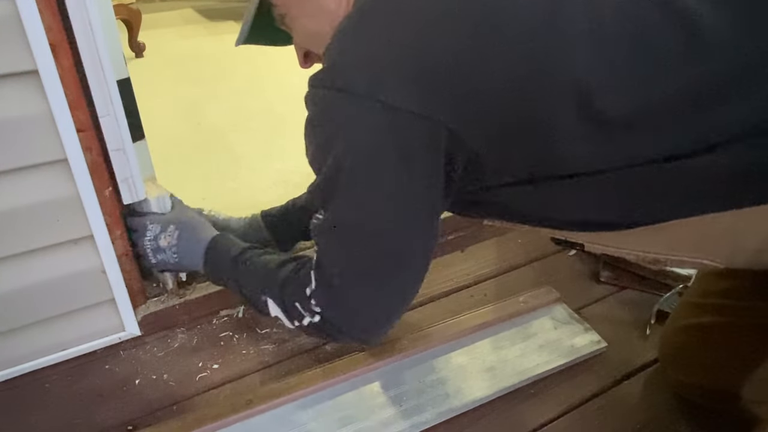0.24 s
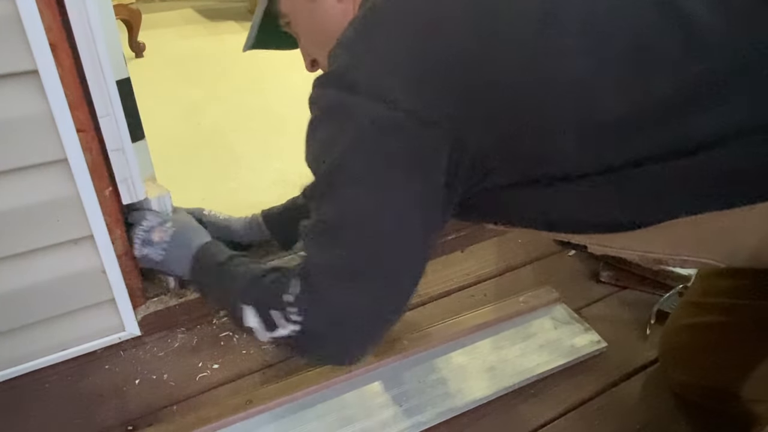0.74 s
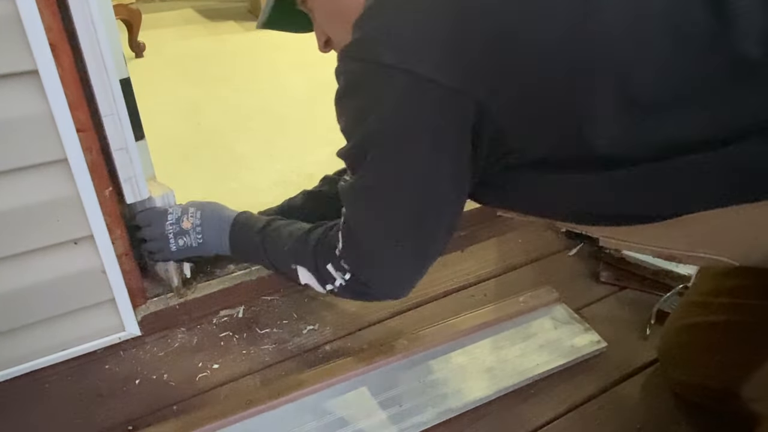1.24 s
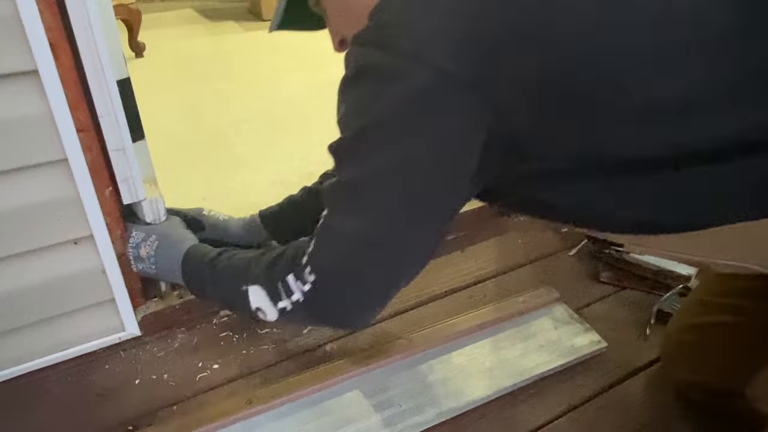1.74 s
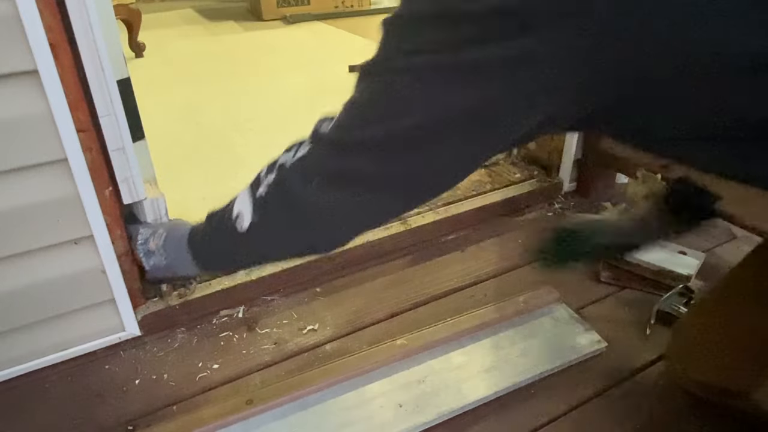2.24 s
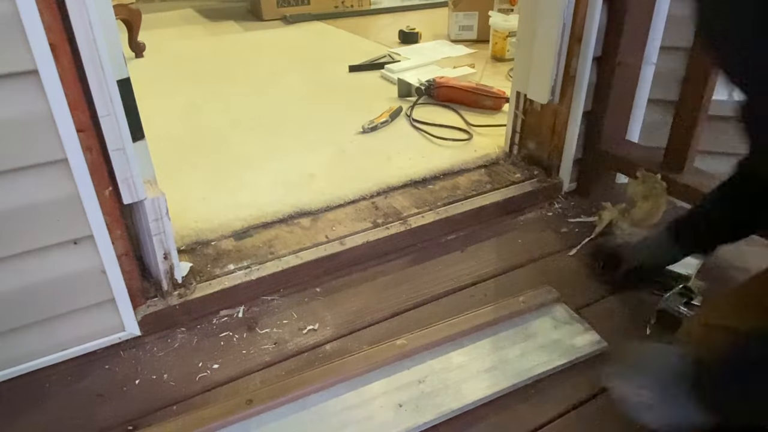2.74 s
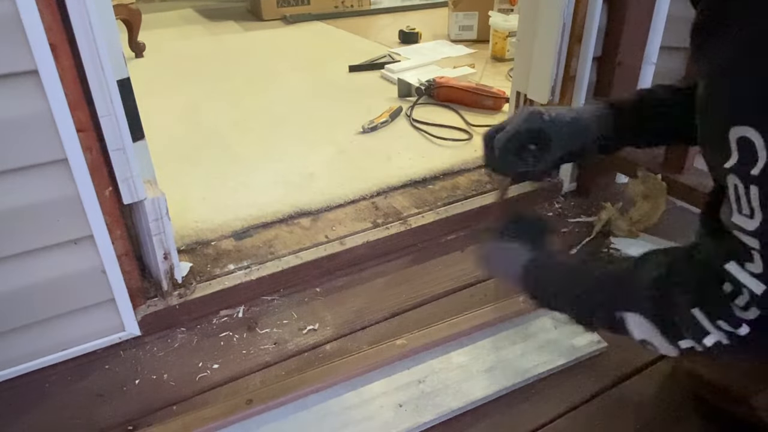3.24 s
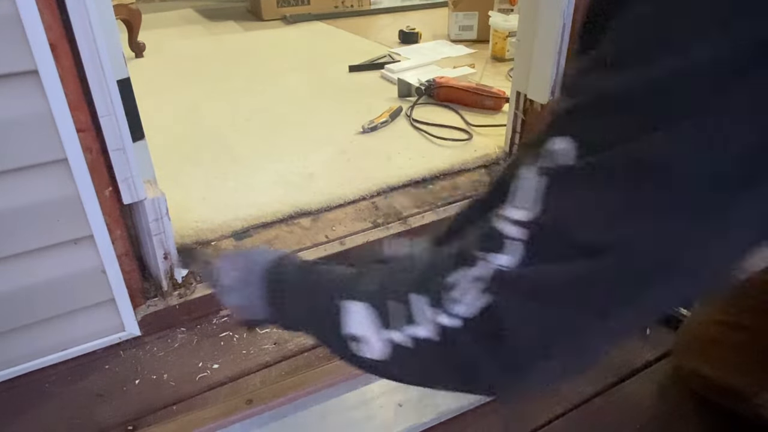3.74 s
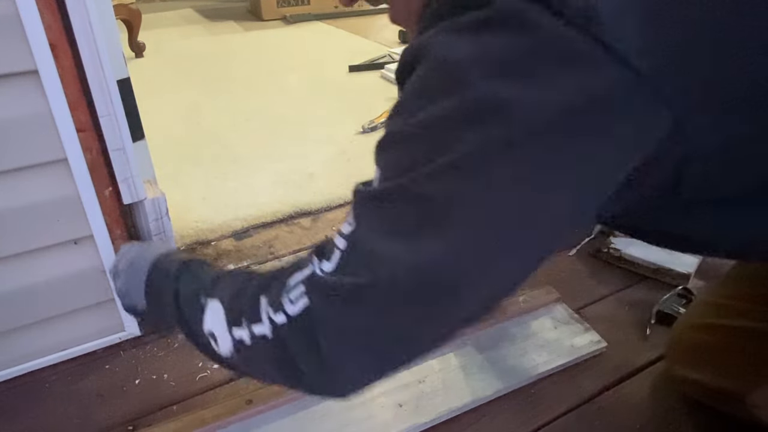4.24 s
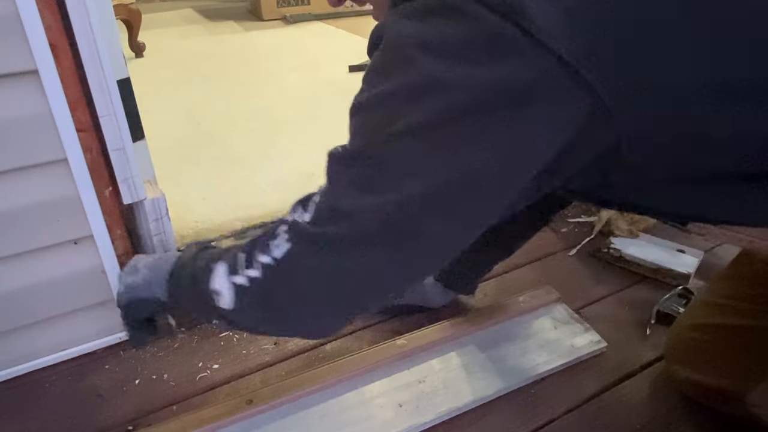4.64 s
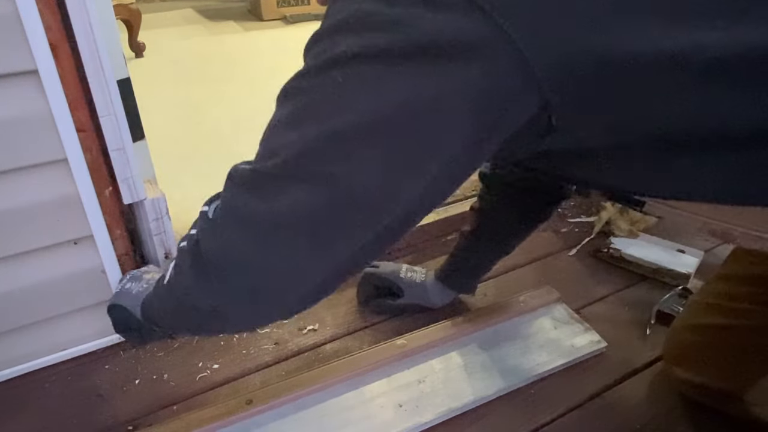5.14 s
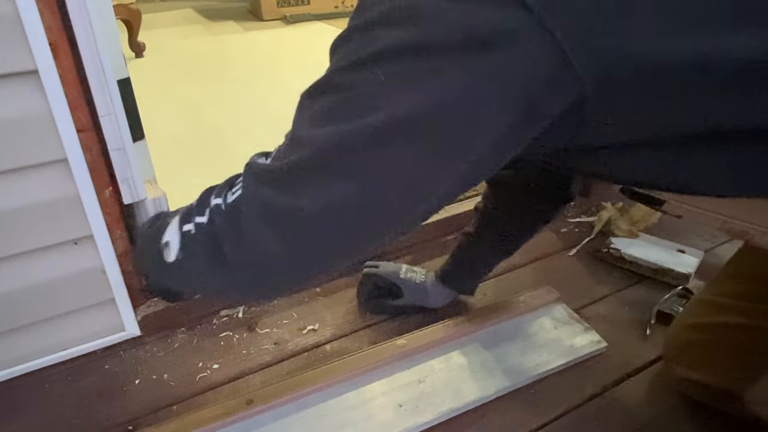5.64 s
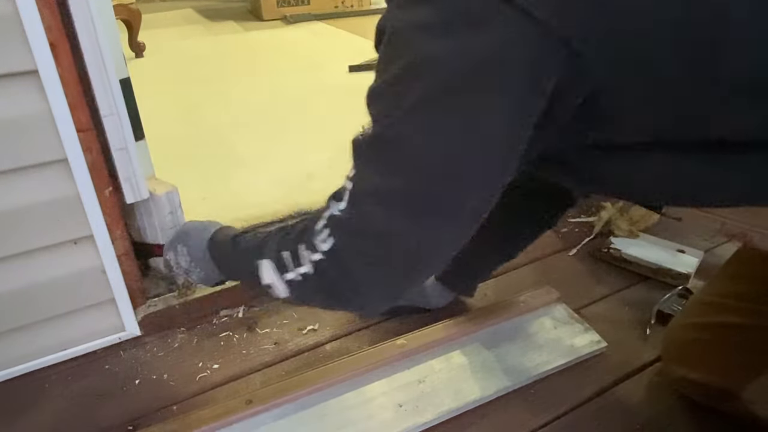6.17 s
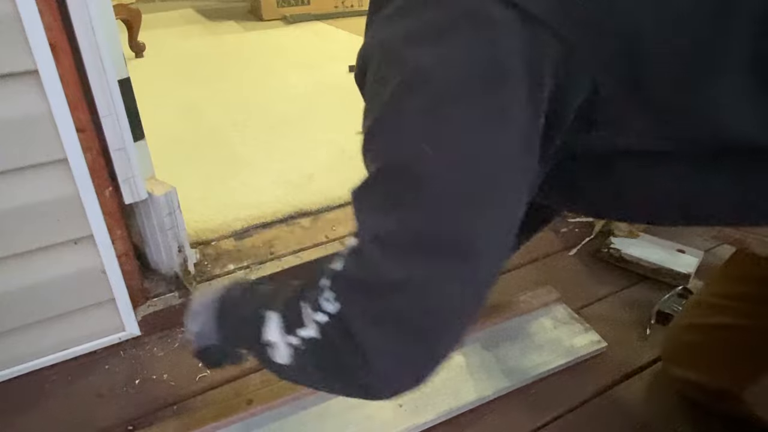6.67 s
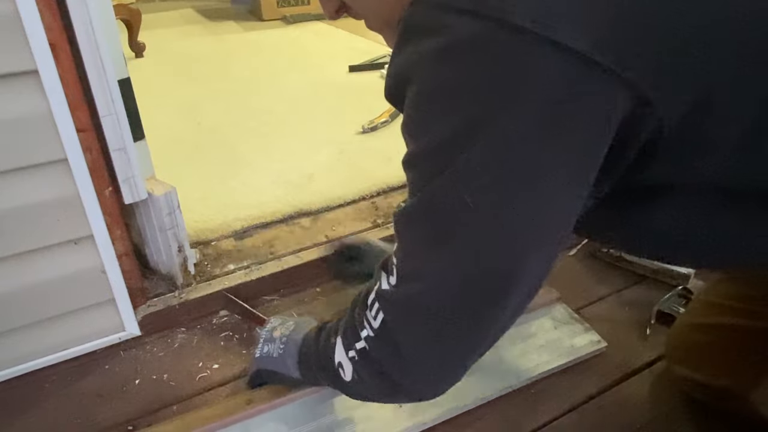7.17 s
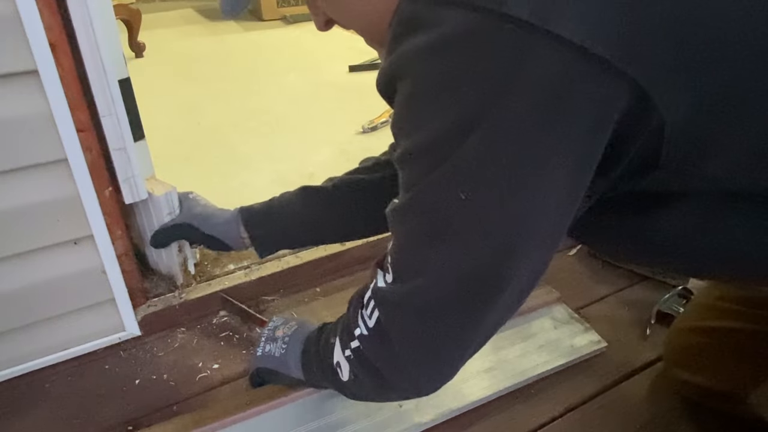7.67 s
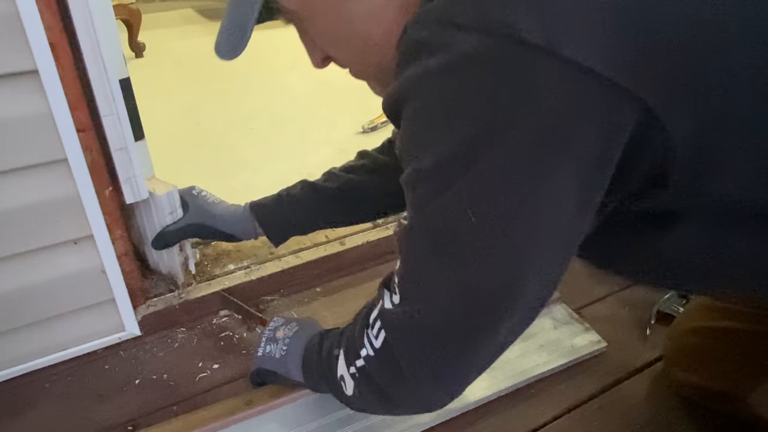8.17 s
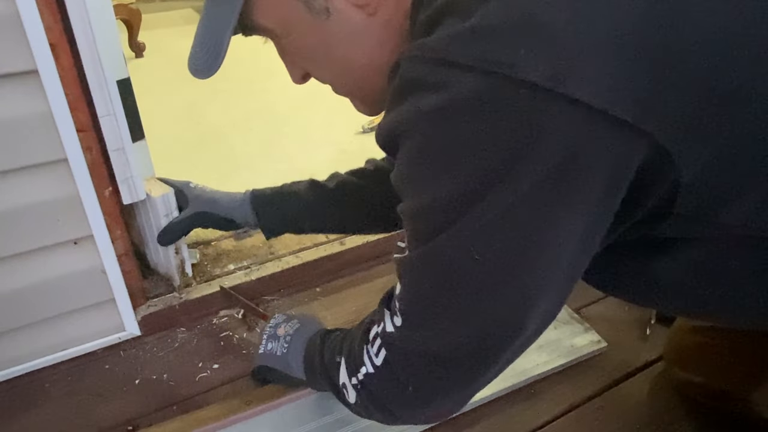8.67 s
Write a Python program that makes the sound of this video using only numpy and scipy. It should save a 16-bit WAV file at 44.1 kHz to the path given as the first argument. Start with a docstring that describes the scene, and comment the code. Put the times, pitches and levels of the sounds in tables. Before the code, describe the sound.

Close stereo microphone on a wooden porch. Gloved hands tear decayed wood from a jamb slightly to the left: sharp snaps, crunching fibres, knocks. A steel tool scrapes and clinks, followed by a heavy drop on boards. Cloth rustles, faint metal jingles, strained wood squeals thinly, then breaks hard. A piece is set down with a hollow knock, and a dry stick taps. Low rumble continues underneath.

```python
"""A low outdoor rumble with a faint wavering hum lies under everything, and sleeves rustle in short strokes.
Gloved hands tear rotten wood out of the foot of a door jamb: splinters snap, fibres crunch, pieces knock on planks.
Then a steel tool scrapes and rings, something heavy drops on the boards, and small metal parts jingle faintly.
Strained wood squeals before more breaks; later a piece is put down and a dry stick taps. The porch echoes.
Wood and steel are sums of fading tones; cracks, cloth and rumble are shaped noise; fibres are streams of ticks."""
import sys
import numpy as np
from scipy import signal
from scipy.fft import rfft, irfft, next_fast_len
from scipy.io import wavfile
from scipy.ndimage import uniform_filter1d, map_coordinates

SR = 44100
rng = np.random.default_rng(int(sys.argv[2]) if len(sys.argv) > 2 else 0)


def unload_audio(sound):
    """Save the sound as a 16-bit wav file, at the path given as the first command line argument."""
    columns = np.transpose(np.atleast_2d(sound))
    # keep every value between -1 and 1, then stretch to whole-number steps
    steps = np.round(np.clip(columns, -1, 1) * 32767)
    wavfile.write(sys.argv[1], SR, steps.astype(np.int16))


N = 392931  # length in samples
T = np.arange(SR // 2) / SR  # time in seconds within one short sound
JAMB_LEAD_S = .00041  # how much sooner the left microphone hears the jamb

# Ringing tones of a splinter or dry stick.
# Each row: pitch in Hz (a snap shifts it by chance), relative level in dB, time in seconds to fade by 60 dB.
SPLINTER_MODES = [(1480, 2, .07), (1560, 0, .06), (1870, -5, .045), (2300, 2, .04), (2770, 1, .045),
                  (4360, 0, .025), (5220, 0, .04), (6930, -6, .04), (7600, -3, .025), (11500, -6, .03)]


def amp(db):
    """Decibels to gain."""
    return 10 ** (np.asarray(db) / 20)


def unit(x):
    """Scaled to an rms (average strength) of 1."""
    return x / np.sqrt(np.mean(x ** 2) + 1e-20)


def struck(x):
    """Scaled to rms 1 over its first fiftieth of a second."""
    start = x[..., :SR // 50]
    return x / np.sqrt(np.mean(start ** 2) + 1e-20)


def along(points, hz):
    """Read (Hz, value) points at any frequency, with straight lines on a log axis."""
    point_hz, values = np.transpose(points)
    return np.interp(np.log(hz + 1), np.log(point_hz + 1), values)


def over_time(points):
    """Join (seconds, value) points into one value per sample."""
    return np.interp(np.arange(N) / SR, *np.transpose(points))


def wobble(rate):
    """A smooth random curve through rate random points a second."""
    points = rng.standard_normal(int(N * rate / SR) + 4)
    return map_coordinates(points, [np.arange(N) * rate / SR])


def envelope(s, hold, rise, fall):
    """Gain that is full from s for hold seconds; it takes rise and fall seconds to cover 30 dB."""
    t = np.arange(N) / SR - s
    before = np.maximum(-t, 0)
    after = np.maximum(t - hold, 0)
    return amp(-30 * (before / rise + after / fall))


def filtered(x, response):
    """Multiply the spectrum of x by a response that depends on frequency."""
    n = x.shape[-1]
    padded = next_fast_len(n + SR // 8)
    spectrum = rfft(x, padded) * response(np.fft.rfftfreq(padded, 1 / SR))
    return irfft(spectrum, padded)[..., :n]


def stereo(pair, width):
    """Use two unrelated signals as the middle and the sides."""
    middle, side = pair
    return np.array([middle + width * side, middle - width * side])


def noise(spectrum, width, size=N):
    """Coloured stereo noise of rms 1."""
    white = stereo(rng.standard_normal((2, size)), width)
    return unit(filtered(white, lambda hz: amp(along(spectrum, hz))))


def grains(spectrum, rate, spread_db, width):
    """A stream of tiny ticks of very unequal size, about rate a second, rms 1."""
    sizes = amp(spread_db * np.clip(rng.standard_normal(N), -2, 2))
    sizes = sizes * (rng.random(N) < rate / SR)
    ticks = stereo(rng.standard_normal((2, N)) * sizes, width)
    return unit(filtered(ticks, lambda hz: amp(along(spectrum, hz))))


def tone(hz):
    """A sine of rms 1 that follows a pitch curve."""
    return np.sqrt(2) * np.sin(2 * np.pi * np.cumsum(hz) / SR)


def burst(lo_hz, hi_hz, t60, attack, width):
    """Crowded, quickly damped vibrations of one frequency band, made of fading noise."""
    def band(hz):
        return 1 / np.sqrt((1 + (lo_hz / (hz + 1)) ** 8) * (1 + (hz / hi_hz) ** 8))

    crowd = filtered(stereo(rng.standard_normal((2, len(T))), width), band)
    return struck(crowd * amp(-60 * T / t60) * (1 - np.exp(-T / attack)))


def ring(modes, width, scatter_db):
    """Damped tones at new strengths, each reaching the two microphones in its own phase."""
    hz, db, t60 = np.transpose(modes)[:, :, None]
    size = amp(db + scatter_db * rng.standard_normal(hz.shape))
    phase = rng.uniform(0, 2 * np.pi, hz.shape) + width * rng.standard_normal((2, *hz.shape))
    fade = amp(-60 * T / t60)
    return np.sum(size * fade * np.sin(2 * np.pi * hz * T + phase), axis=1)


def patchy(x, depth_db, size):
    """Every few milliseconds the sound takes another colour; size sets how long a colour lasts."""
    z = signal.stft(x, nperseg=256)[2]
    field = uniform_filter1d(rng.standard_normal(z.shape[1:]), 3, 0)  # blurred over pitch
    field = uniform_filter1d(field, size, 1)  # then over time
    gain = unit(amp(depth_db * np.clip(unit(field), -2, 2)))
    return signal.istft(z * gain, nperseg=256)[1][:, :N]


def from_left(x, lead):
    """The left microphone hears it lead seconds sooner (half early on the left, half late on the right)."""
    return filtered(x, lambda hz: np.exp(1j * np.pi * hz * lead * np.array([[1], [-1]])))


def placed(s, x):
    """A sound made at time s comes from where the hands are: sooner and louder on the nearer side."""
    # Each row: time in seconds, side (1 = at the jamb on the left, 0 = straight ahead, below 0 = right).
    hands = [(0, 0.92), (1.7, 0.76), (2.2, 0.4), (3.3, -0.49), (3.85, 0.82), (6.3, 0.94), (6.95, -0.11),
             (8.9, 0.39)]
    side = np.interp(s, *np.transpose(hands))
    tilt_db = side * 0.53 * np.array([[1], [-1]])  # up on the left, down on the right
    return amp(tilt_db) * from_left(x, side * JAMB_LEAD_S)


def add(track, s, sound):
    """Mix a sound in at time s."""
    part = track[:, round(s * SR):][:, :sound.shape[1]]
    part += sound[:, :part.shape[1]]


def outdoors():
    """Distant rumble and wash are coloured noise; the wavering low tones are sines of drifting pitch."""
    # Two noise colours. Each row: frequency in Hz, relative level in dB per Hz.
    rumble_colour = [(13, -46), (22, -18), (29, -23), (40, -2.5), (65, 3.5), (97, -5.5), (119, -1.5),
                     (163, -15), (242, -18), (350, -23.5), (460, -23), (770, -120)]
    wash_colour = [(100, -36), (170, 2.5), (243, 2.5), (359, -12.5), (439, -6), (884, -5), (1210, -9.5),
                   (2210, -21), (2840, -27), (4600, -31), (7000, -49.5), (9100, -73), (15400, -120)]
    # Slow changes of loudness. Each row: time in seconds, relative level in dB.
    rumble_level = [(0.0, -45), (0.49, -47.5), (0.87, -44), (2.53, -45.5), (3.25, -39.5), (3.49, -45.5),
                    (5.33, -39), (5.72, -42.5), (8.9, -41.5)]
    wash_level = [(0.0, -58.5), (2.01, -57), (3.25, -50.5), (3.47, -52.5), (8.5, -51), (8.9, -52.5)]
    hum_level = [(0.0, -51), (3.77, -54.5), (4.14, -40), (5.11, -54), (8.65, -47.5), (8.9, -51)]
    rumble = amp(over_time(rumble_level) + 2.0) * noise(rumble_colour, width=0.2)
    wash = amp(over_time(wash_level) + 3.5 + 0.42 * wobble(15.0)) * noise(wash_colour, width=0.89)
    hum = amp(over_time(hum_level) - 2 + 1.5 * wobble(6.6)) * tone(111 + 3 * wobble(7.9))
    # a deeper drone swells for a moment
    drone = amp(2 * wobble(14)) * tone(73 + 5 * wobble(25))
    swell = amp(-36.5) * envelope(4.8, 0.68, rise=0.62, fall=0.17)
    return rumble + wash + hum + swell * drone


def hiss():
    """The microphones' own faint noise."""
    colour = [(1000, -7.5), (4000, -1), (9000, -1.5), (12000, 1.0), (16000, -14)]  # Hz, dB
    return amp(-72.5) * noise(colour, width=0.2)


def sleeves():
    """Cloth and gloves brush along crumbly wood in short, flat-topped strokes of noise and ticks."""
    # Strokes. Each row: centre in seconds, length in seconds between half-gain points, relative level in dB.
    strokes = [(0.061, 0.082, -50.5), (0.225, 0.12, -60), (1.076, 0.08, -50.5), (1.475, 0.13, -60.5),
               (2.122, 0.39, -64.5), (2.365, 0.16, -48.5), (2.785, 0.062, -54.5), (2.884, 0.036, -54.5),
               (3.531, 0.066, -61), (4.428, 0.21, -63.5), (4.639, 0.029, -57.5), (4.87, 0.068, -58.5),
               (6.29, 0.09, -59.5), (6.387, 0.017, -55), (6.949, 0.23, -60.5), (8.38, 0.12, -58)]
    # Colour of the rubbing. Each row: frequency in Hz, relative level in dB per Hz.
    cloth_colour = [(530, -28), (900, 2.5), (1900, -6.5), (2630, -3.5), (3040, -6), (4740, -2.5),
                    (9090, -10), (11800, -8), (16000, -23.5)]
    t = np.arange(N) / SR
    pressure = sum(amp(db) / (1 + ((t - s) / (length / 2)) ** 4) for s, length, db in strokes)
    brushing = noise(cloth_colour, width=0.66)
    crumbs = amp(-1.5) * grains(cloth_colour, rate=3200, spread_db=5.0, width=0.6)
    return pressure * amp(2 * wobble(40)) * (brushing + crumbs)


def snaps():
    """A splinter lets go: a sharp crack over a slower body, and the short ring of a stick of chance length."""
    # Splinters snapping. Each row: start in seconds, overall level in dB before scaling,
    # then relative levels in dB of thud, body and fizz.
    breaks = [(0.3602, -43.5, -24, -23, -6), (0.4175, -31.5, -10, -3.5, -10), (0.432, -20.5, -15, -36, -16),
              (0.7933, -37, -2, 2.5, -15), (0.8005, -34, 7, -11.5, -5), (0.82, -29, -13, -15, -5.5),
              (0.832, -19, -14, -9, -6.5), (0.8447, -9.5, -21, -10, -9), (1.026, -43, -20, -10, -14.5),
              (1.034, -37, -26, -7, -26), (1.081, -39, -17, 2, -12.5), (3.3024, -43, -3, -22.5, -24.5),
              (3.801, -39, -12, -16, -10.5), (3.885, -34, -9, -11, -13.5), (4.2699, -37, 5, 5.5, -12.5),
              (4.4591, -47.5, 23.5, 20.5, -22.5), (5.178, -37, -3, -1.5, -53),
              (5.3698, -42.5, 15, 14, -19.5), (5.6183, -12.5, -9, 3.5, -15), (5.631, -17.5, 7, 2.5, -23.5),
              (5.9666, -30, -27, -7.5, -8), (6.128, -28.5, -6, 3, -1.5), (6.145, -28.5, 10, 2, -2.5),
              (6.156, -30, -7, 1, -1), (6.1637, -26.5, 15, 3, -7.5), (6.177, -32.5, 8, 4, -5),
              (6.688, -46, 15, 11.5, -4.5), (7.079, -35, -1, 2, -14.5), (7.224, -39, 16, 10, -13),
              (7.6813, -33, -18, -22, -17), (7.9217, -39.5, 0.5, -22, -21), (7.9748, -34, -28, -21, -26),
              (8.6248, -33, 1, -9, -14), (8.6803, -23.5, -6, -11, -10)]
    crack_t60 = 0.026  # seconds to fade by 60 dB
    out = np.zeros((2, N))
    for s, db, thud_db, body_db, fizz_db in breaks:
        thud = amp(thud_db - 3) * burst(160, 650, t60=.085, attack=.002, width=.7)
        body = amp(body_db - 2.0) * burst(660, 1700, t60=2.76 * crack_t60, attack=0.00066, width=0.7)
        crack = amp(-8.0) * burst(2400, 5600, t60=crack_t60, attack=0.0012, width=1.0)
        fizz = amp(fizz_db + 1.0) * burst(5000, 15000, t60=.7 * crack_t60, attack=0.0024, width=0.61)
        pitch = np.exp(0.08 * rng.standard_normal())  # the stick's chance length
        colour = [(1200, body_db), (2000, -9.0), (3000, -29.5), (5000, -4.0), (8000, fizz_db)]
        modes = [(hz * pitch, level + along(colour, hz), t60) for hz, level, t60 in SPLINTER_MODES]
        stick = amp(-1) * ring(modes, width=1.1, scatter_db=2) * (1 - np.exp(-T / .001))
        add(out, s, amp(db - 6.0) * placed(s, thud + body + crack + fizz + stick))
    return out


def tearing():
    """Soft fibres give way in clumps of crackles under each pull; a loose piece rasps through sinking tones."""
    # Pulls that build up, peak and let go. Each row: peak time in seconds, relative level in dB,
    # rise and fall in seconds per 30 dB.
    pulls = [(0.435, -35.5, 0.025, 0.086), (.848, -31, 0.11, .06), (1.606, -29, 0.062, 0.024),
             (4.275, -62, .02, .12), (5.63, -24, 0.035, 0.023), (6.135, -29, 0.057, .04),
             (6.166, -28.5, 0.06, 0.076), (7.195, -42, 0.12, 0.21), (7.563, -37.5, 0.055, 0.11),
             (8.689, -30.5, 0.038, 0.075)]
    # Colour of the fibres. Each row: frequency in Hz, relative level in dB per Hz.
    fibre_colour = [(120, -8.5), (300, 17.5), (700, 6), (1500, 1), (3000, 0), (5000, -1.5), (9000, -10),
                    (16000, -17)]
    # Tones of the loose piece. Each row: pitch in Hz at the start of the rasp, relative level in dB.
    rasp_resonances = [(1880, 4), (2700, -4), (4900, -7)]
    clumps = unit(amp(2.5 * wobble(260)))
    fibres = grains(fibre_colour, rate=4000, spread_db=4, width=.8)
    pull = sum(amp(db) * envelope(s, 0, rise, fall) for s, db, rise, fall in pulls)
    crackle = pull * clumps * fibres

    rasp_s = .85
    grit_colour = [(600, -12), (1800, 0), (5000, -3), (9000, -12), (16000, -23)]  # Hz, dB
    grit = grains(grit_colour, rate=5000, spread_db=4, width=.9)
    # the tones sink by half their pitch per second, for 0.3 s, as the piece comes free
    sag = 1 - 0.5 * np.clip(np.arange(N) / SR - rasp_s, 0, .3)
    creak = sum(amp(db + 4 * wobble(220)) * tone(hz * sag + 330 * wobble(1500))
                for hz, db in rasp_resonances)
    scrape = amp(-49) * envelope(rasp_s, 0.021, rise=.01, fall=0.33)
    rasp = scrape * (amp(2.5) * grit + creak) * unit(amp(1.2 * wobble(130)))
    return from_left(patchy(crackle, depth_db=5, size=2) + rasp, JAMB_LEAD_S)


def corner(x):
    """Close reflections from jamb, sill and deck give the breaking wood a boxy colour."""
    # Each row: delay in seconds, gain.
    reflections = [(.0007, 0.051), (.0019, -0.015), (.0031, .2)]
    return filtered(x, lambda hz: 1 + sum(gain * np.exp(-2j * np.pi * hz * delay)
                                          for delay, gain in reflections))


def porch(x):
    """Walls and the open room answer with a noise tail, each frequency dying at its own speed."""
    # Each row: frequency in Hz, time in seconds for the echo to fade by 60 dB.
    decay = [(100, 1), (400, 0.72), (1500, 0.36), (4000, 0.3), (8000, 0.33), (15000, 0.14)]
    hz, t, z = signal.stft(rng.standard_normal((2, SR)), SR, nperseg=256)
    fade = amp(-60 * t / along(decay, hz)[:, None])
    tail = signal.istft(z * fade, SR, nperseg=256)[1]
    return signal.fftconvolve(x, tail / np.linalg.norm(tail[0]), axes=1)[:, :N]


def knocks():
    """Each blow rings the planks and booms the deck, with its own share of clack and edge."""
    # Blows. Each row: start in seconds, overall level in dB before scaling, then relative levels in dB
    # of boom, clack, edge and high ring, and the pitch ratio of the spot that is hit.
    blows = [(0.801, -22, -11.5, -16, -37, 5.5, 0.88), (0.848, -24.5, 1.5, -11, -15, -3, 0.86),
             (1.607, -23, -1, -18.5, -13, 3.5, 0.84), (2.215, -46.5, 11, -12, -2, 5, 1.28),
             (3.112, 1.5, -34, -4, -26, -3, 0.98), (3.126, -17, 8, -8, -26, 8, 0.98),
             (3.149, -4, -20, -6, -32, -4.5, 1.02), (3.171, -14.5, -20, -17, -30, -12, 0.95),
             (3.214, -23, -4, -23, -27, -5, 0.98), (3.803, -21, -1, -3, -31, -7.5, 1),
             (3.816, -20.5, -2.5, -32, -20, -3, 0.91), (3.888, -16.5, -1, -24, -34, 1, .8),
             (5.544, -39, 9.5, -21, -27, 2, 1.45), (5.861, -34, 7, -7, -10.5, -5, 1.35),
             (6.138, -11, -16, -9.5, -12, -3, 0.8), (6.16, -9, -12, -4.5, -31, -6.5, 0.87),
             (6.173, -35, -11, -1, -10, -11, 0.76), (6.195, -36, 15, -27, -32, -2, 0.74),
             (8.421, -40.5, 13, -13, -17, -6, 0.77)]
    # Ringing tones. Each row: pitch in Hz before the spot's ratio, relative level in dB,
    # time in seconds to fade by 60 dB.
    planks = [(120, 9, 0.1), (138, 3, 0.27), (200, -3, 0.089), (222, -2, 0.2), (291.2, -1.5, 0.29),
              (368, -9.5, .2), (404.7, -2, 0.13), (489, 7.5, 0.12), (531.6, 1.5, 0.15), (594, -1.5, 0.12),
              (820, -7, .06), (922, 3.5, .095), (1169, 9.5, 0.048), (1267, -5, 0.06), (1540, -11.5, 0.076),
              (1780, -6.5, 0.035)]
    out = np.zeros((2, N))
    for s, db, boom_db, clack_db, edge_db, ring_db, place in blows:
        high_db = clack_db + ring_db
        colour = [(140, boom_db), (260, -1.0 + 0.28 * boom_db), (560, -14.0),
                  (850, high_db), (1250, high_db), (2000, edge_db)]
        modes = [(hz * place, level + along(colour, hz), t60) for hz, level, t60 in planks]
        wood = amp(-5.5) * ring(modes, width=0.59, scatter_db=-1.5) * (1 - np.exp(-T / 0.0025))
        thump = amp(-14.0 + 0.42 * boom_db) * burst(140, 560, t60=0.17, attack=0.00158, width=0.47)
        joists = amp(-29.5) * burst(180, 670, t60=0.17, attack=0.0014, width=0.37)
        clack = amp(clack_db - 16.0) * burst(540, 1350, t60=0.046, attack=0.0011, width=0.49)
        edge = amp(edge_db - 17.0) * burst(1000, 3700, t60=0.051, attack=0.00034, width=0.88)
        deck = amp(boom_db - 18) * burst(45, 100, t60=0.32, attack=0.012, width=0.61)
        add(out, s, amp(db) * placed(s, wood + thump + joists + clack + edge + deck))
    return out


def tool():
    """Steel catches and slips: each catch is a chatter that rings the blade; grit grinds, small parts jingle."""
    # Catches. Each row: start in seconds, overall level in dB before scaling, treble tilt in dB,
    # relative level in dB of the lowest tone.
    catches = [(2.997, -24, -10, 10), (3.006, -15.5, -13.5, 10), (3.0295, -17, 4, -2.5),
               (3.041, -15.5, 1.5, -1), (3.0604, -8, -6, -6.5), (3.074, -17, -7.5, -5.5),
               (3.096, -28.5, -9, 13.5), (3.114, -35, -4.5, 5), (3.149, -37, -15.5, 10)]
    # Tones of the blade, then of small metal parts.
    # Each row: pitch in Hz, relative level in dB, time in seconds to fade by 60 dB.
    steel_modes = [(4334, -5, .29), (5744, -3, .38), (5950, 1, .05), (6600, -5, .03), (7465, 0, .14),
                   (7843, -10, .32), (9413, -2, .08), (10430, -6, .12), (10960, -1, .07), (11315, -1, .09),
                   (12230, -14, .08), (15200, -6, .07)]
    trinket_modes = [(3180, 2, 0.18), (4400, -4, .14), (4950, -4, 0.12), (7780, -1, 0.15), (9430, -3, 0.09),
                     (14570, -1, .1)]
    # Faint jingles. Each row: start in seconds, relative level in dB.
    jingles = [(3.997, -60), (4.28, -61), (4.36, -61), (6.442, -62), (6.55, -66), (6.691, -54),
               (6.724, -59), (6.83, -62), (6.87, -60)]
    # Where it drags over the boards. Each row: start in seconds, relative level in dB, hold in seconds.
    drags = [(2.993, -27, 0.029), (3.029, -24, 0.026), (3.06, -27, 0.014), (3.093, -32, 0.035)]
    # Colour of the grinding. Each row: frequency in Hz, relative level in dB per Hz.
    drag_colour = [(200, -0.5), (480, 12.5), (750, -7), (1300, 0), (2000, -4), (3000, -8), (6000, -8.5),
                   (12000, -27)]
    out = np.zeros((2, N))
    # contact soaks up most of the ring at once and leaves a thin tail
    damping = .08 + amp(-60 * T / .045)
    for s, db, tilt_db, low_db in catches:
        chatter = rng.standard_normal(len(T)) * amp(-60 * T / .035) * (1 - np.exp(-T / .0007))
        colour = [(4400, low_db), (5500, 0), (14000, tilt_db)]
        modes = [(hz, level + along(colour, hz), t60) for hz, level, t60 in steel_modes]
        blade = damping * ring(modes, width=.5, scatter_db=1.5)
        steel = signal.fftconvolve(blade, chatter[None], axes=1)[:, :len(T)]
        scrape = burst(900, 11000, t60=.035, attack=.0005, width=.6)
        sustain = ring(modes, width=.5, scatter_db=1.5) * (1 - np.exp(-T / .002))
        clink = amp(-12.5) * struck(steel) + amp(-29.5) * struck(scrape) + amp(-25.5) * struck(sustain)
        add(out, s, amp(db) * clink)
    for s, db in jingles:
        jingle = struck(ring(trinket_modes, width=0.54, scatter_db=4))
        add(out, s, amp(db) * jingle * (1 - np.exp(-T / 0.0018)))
    slide = sum(amp(db) * envelope(s, hold, rise=0.012, fall=0.03) for s, db, hold in drags)
    grind = unit(amp(2.5 * wobble(220))) * noise(drag_colour, width=.7)
    return patchy(out + slide * grind, depth_db=4, size=3)


def squeals():
    """Strained wood gives thin, stuttering tones that swell, glide and run into each other before it breaks."""
    # Each row: centre in seconds, length in seconds, pitch in Hz at the centre, relative level in dB,
    # pitch roughness in Hz, glide in Hz per second.
    strains = [(4.89, 0.2, 8140, -61, 90.5, -2), (5.0, 0.18, 8420, -68, 188, 601),
               (5.14, .17, 8200, -68, 258, -1200), (5.333, 0.17, 7500, -71, 200, -3000),
               (5.428, 0.25, 8130, -71, 131, -1400), (5.519, 0.071, 6440, -59, 40, 100)]
    out = np.zeros(N)
    for s, length, hz, db, rough_hz, glide in strains:
        t = np.clip(np.arange(N) / SR - s, -2 * length, 2 * length)
        waver_hz = rough_hz * wobble(1600) + 30 * wobble(40)
        swell = np.exp(-(2 * t / length) ** 2)
        out += amp(db + 3.5 * wobble(70)) * swell * tone(hz + glide * t + waver_hz)
    return out


def put_down():
    """A piece is put down on the boards: a dry, hollow knock, then weaker knocks as it settles."""
    # Each row: start in seconds, overall level in dB before scaling, relative level in dB of the clack.
    landings = [(6.96, -3.5, 4), (7.023, -27.5, -6), (7.036, -21, -16.5), (7.085, -31, -12)]
    # Tones of the knock. Each row: pitch in Hz, relative level in dB, time in seconds to fade by 60 dB.
    board_modes = [(110, -6.5, 0.31), (152, 7.5, 0.089), (233.7, -4.5, .26), (292, 1.5, .1),
                   (383, -5, 0.11), (416.6, 1, .07), (534, 3, 0.051), (629, -1, 0.1), (858, 2.5, 0.035),
                   (1030, 3.5, 0.032), (1292, -7, .07), (1510, -10.5, 0.056), (2620, -9.5, .035)]
    out = np.zeros((2, N))
    for s, db, clack_db in landings:
        colour = [(300, 0), (900, clack_db)]
        modes = [(hz, level + along(colour, hz), t60) for hz, level, t60 in board_modes]
        wood = struck(ring(modes, width=.6, scatter_db=1) * (1 - np.exp(-T / .001)))
        contact = amp(clack_db - 7) * burst(200, 1500, t60=.045, attack=.0005, width=.8)
        add(out, s, amp(db - 9.0) * placed(s, wood + contact))
    return out


def taps():
    """A dry stick, damped by the glove, taps boards and jamb and rings briefly at the same pitches each time."""
    # Each row: start in seconds, overall level in dB before scaling, relative level in dB of the fizz.
    touches = [(7.1832, -28.5, -8.5), (7.1939, -27.5, -11), (7.2278, -36.5, -2), (7.2592, -28, -10.5),
               (7.4384, -44.5, -6), (7.4834, -41, -17), (7.562, -11, -7)]
    out = np.zeros((2, N))
    for s, db, fizz_db in touches:
        glove = amp(-60 * T / .07)
        stick = ring(SPLINTER_MODES, width=.8, scatter_db=1.2) * glove * (1 - np.exp(-T / .001))
        contact = amp(-1.5) * burst(630, 6000, t60=.028, attack=.001, width=.9)
        fizz = amp(fizz_db) * burst(6500, 16000, t60=0.03, attack=.001, width=.6)
        add(out, s, amp(db - 13.5) * placed(s, struck(stick) + contact + fizz))
    return out


def scene():
    """The work at the jamb, its echo and the background."""
    splinters = amp(-1.5) * corner(snaps() + tearing()) + squeals()
    blows = knocks() + put_down() + taps() + tool()
    echo = porch(amp(-16.0) * splinters + amp(-20.0) * blows)
    background = from_left(outdoors(), lead=0.00041) + hiss()
    return splinters + blows + echo + sleeves() + background


def record(dry):
    """The recorder drops the deepest bass, rounds off the highest peaks and keeps nothing above its band limit."""
    top_hz = 16600
    bass_cut = signal.butter(4, 34, "highpass", fs=SR, output="sos")
    lean = signal.sosfilt(bass_cut, dry)
    rounded = lean / (1 + np.abs(lean / .95) ** 6) ** (1 / 6)
    return filtered(rounded, lambda hz: hz < top_hz)


dry = scene()
out = record(dry)
unload_audio(out)
```